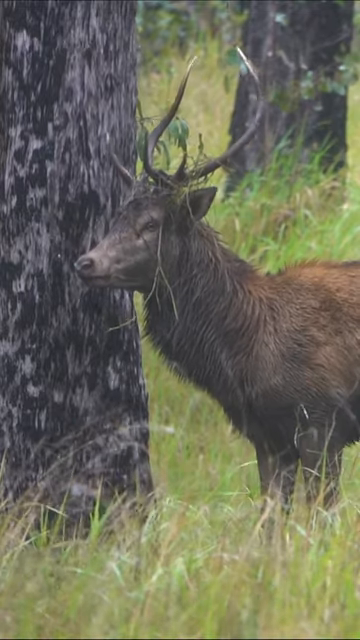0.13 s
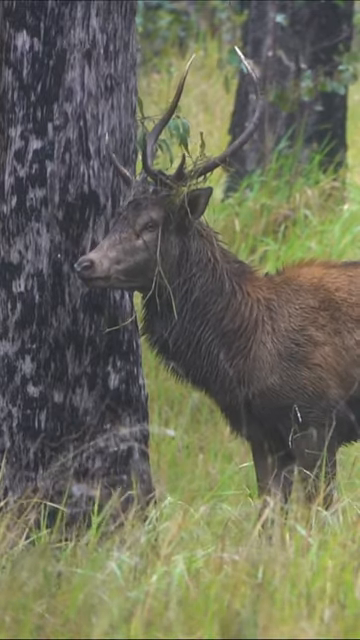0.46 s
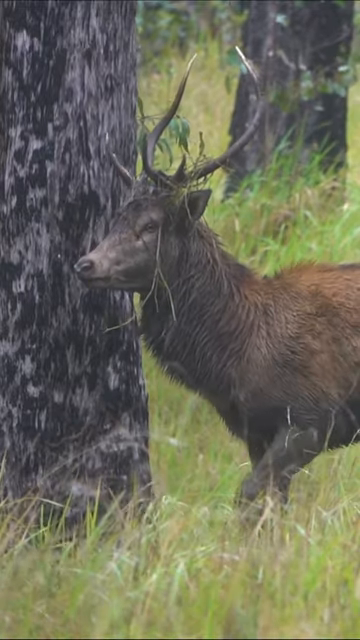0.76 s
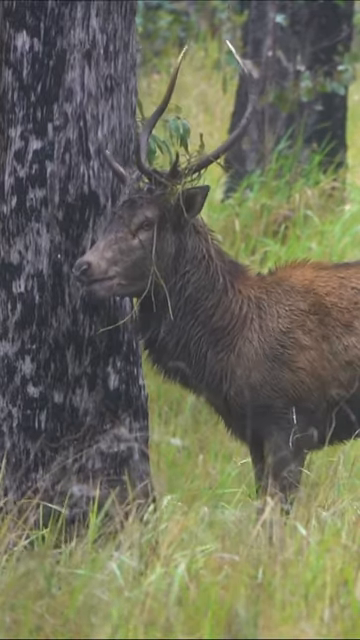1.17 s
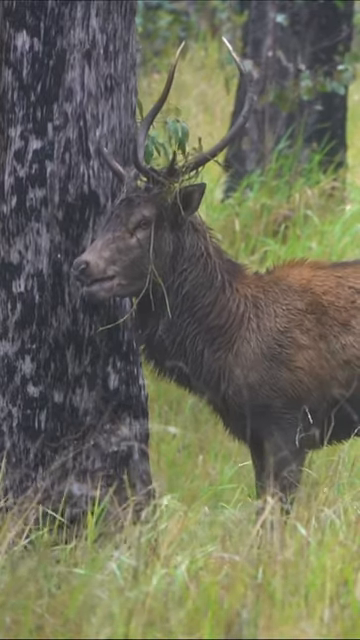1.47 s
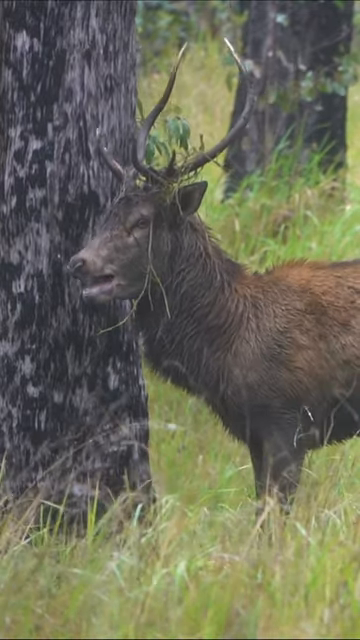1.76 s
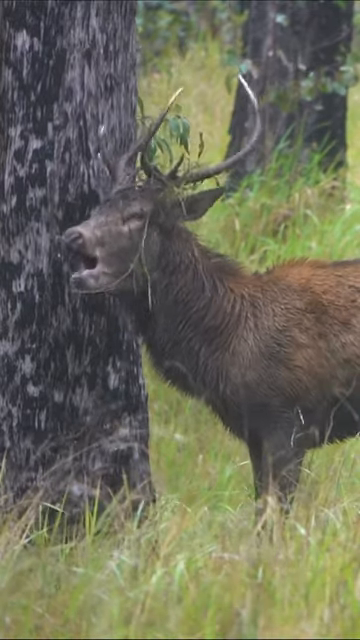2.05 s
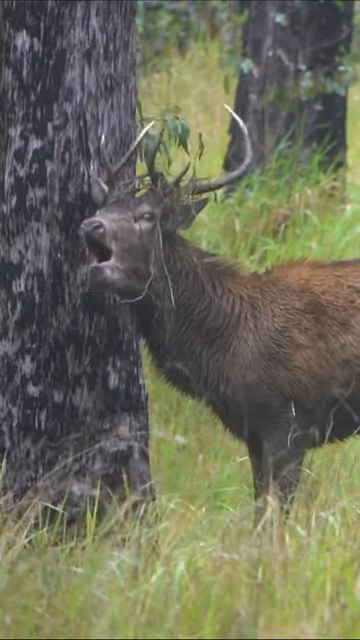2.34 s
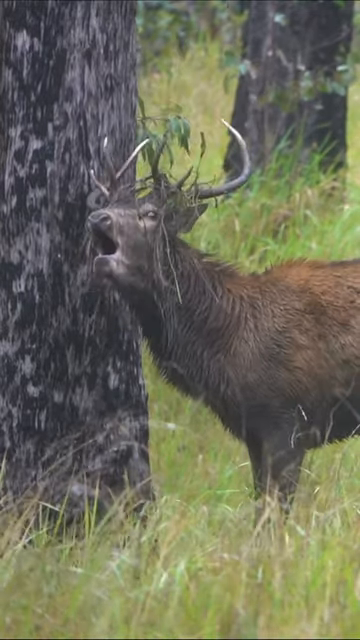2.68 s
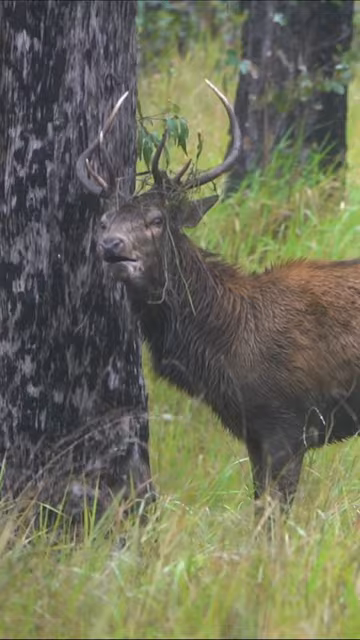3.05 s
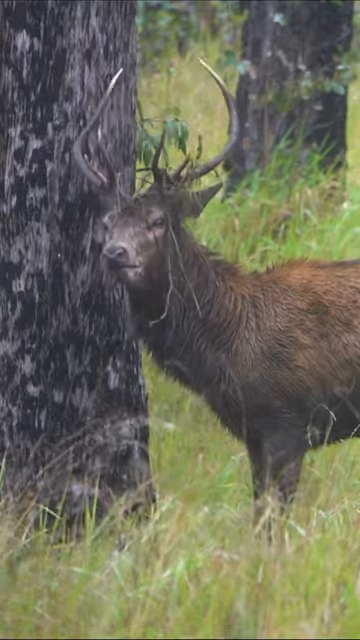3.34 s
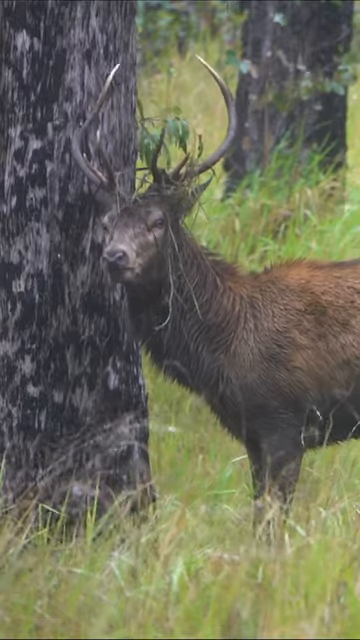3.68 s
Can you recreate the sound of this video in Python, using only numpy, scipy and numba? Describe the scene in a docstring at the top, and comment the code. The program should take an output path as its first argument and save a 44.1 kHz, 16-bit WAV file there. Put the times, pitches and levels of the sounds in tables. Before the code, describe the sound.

Single low guttural roar from a large deer, over microphone wind rumble and small stem clicks.

```python
"""A large stag roars once in tall grass among trees: vocal-fold pulses and puffs of breath ring a long
throat whose resonances shift as the neck stretches and the mouth opens; two low tones sound from the chest.
Dry stems tick as noise bursts with short rings, over a random crackle. Wind on the microphone is gusting low
noise with soft thumps. The wood returns a dull echo, a decaying noise tail, and hisses faintly as shaped noise."""
import sys
import numpy as np
from scipy import signal
from scipy.fft import rfft, irfft
from scipy.io import wavfile
from scipy.ndimage import uniform_filter1d
from numba import njit

SR = 44100
rng = np.random.default_rng(int(sys.argv[2]) if len(sys.argv) > 2 else 0)


def inscribe(sig):
    """Save sig as 16-bit PCM at rate SR to the path in sys.argv[1].

    A 1-D sig is mono; a 2-D sig holds one channel per row.
    Samples are clipped to [-1, 1] before scaling.
    """
    pcm = np.round(np.clip(np.atleast_2d(sig).T, -1, 1) * 32767)
    wavfile.write(sys.argv[1], SR, pcm.astype(np.int16))


N = 168021  # samples


def amp(db):
    """Decibels to amplitude."""
    return 10 ** (np.asarray(db) / 20)


def rms_one(x):
    """Scale to an rms of 1."""
    return x / np.sqrt(np.mean(x ** 2) + 1e-20)


def in_time(rows):
    """Join the rows of a time table by straight lines, one signal per column after t."""
    s, *columns = np.transpose(rows)
    return [np.interp(np.arange(N) / SR, s, column) for column in columns]


def drift(rate_hz):
    """Slow random wander of rms 1: noise at every 40th sample through two equal low-pass poles."""
    r = np.exp(-80 * np.pi * rate_hz / SR)
    noise = rng.standard_normal(N // 40 + 2002)
    slow = signal.lfilter([1], [1, -2 * r, r * r], noise)[2000:]  # settled part
    return np.interp(np.arange(N) / 40, np.arange(len(slow)), rms_one(slow))


def coloured(points):
    """Noise of rms 1 whose spectrum follows the points, joined over log frequency."""
    hz, db = np.transpose(points)
    f = np.maximum(np.arange(N // 2 + 1) * SR / N, 1)
    gain = amp(np.interp(np.log(f), np.log(hz), db))
    return rms_one(irfft(rfft(rng.standard_normal(N)) * gain, N))


def ring(x, hz, t60):
    """A struck resonance: a sine that falls 60 dB in t60 seconds."""
    r, w = amp(-60 / (t60 * SR)), 2 * np.pi * hz / SR
    return signal.lfilter([0, np.sin(w)], [1, -2 * r * np.cos(w), r * r], x + 1e-18)


@njit
def moving_resonance(x, turn, r):
    """A resonance of gain 1 with a moving centre; turn is the cosine of its angle per sample."""
    y = np.zeros(len(x))
    for i in range(2, len(x)):
        y[i] = (1 - r * r) / 2 * (x[i] - x[i - 2]) + 2 * r * turn[i] * y[i - 1] - r * r * y[i - 2]
    return y


PITCH_SHAKE, PITCH_SHAKE_HZ = .011, 25  # rms share of pitch at full roughness, rate
SHIMMER_DB = 2  # pulse flicker per unit of roughness away from 0.54
RASP_DB, RASP_LOW_HZ = -1, 400  # puffs against pulses before the low cut, and that cut


def vocal_folds(hz, rough):
    """Steady fold pulses give harmonics; a puff of noise in each cycle replaces them as the voice roughens."""
    shaken_hz = hz * (1 + PITCH_SHAKE * rough * drift(PITCH_SHAKE_HZ))
    phase = 2 * np.pi * np.cumsum(shaken_hz) / SR
    pulses = rms_one(sum(np.cos(k * phase) for k in range(3, 58)))  # chest() adds tones 1 and 2
    puffs = rms_one(rng.standard_normal(N) * (1 - np.sin(phase)) ** 2) * amp(RASP_DB)
    puffs = signal.lfilter(*signal.butter(1, RASP_LOW_HZ, "high", fs=SR), puffs)
    shimmer = amp(SHIMMER_DB * drift(26) * (rough - 0.54))
    return phase, pulses * shimmer * np.sqrt(1 - rough ** 2) + rough * puffs


WANDER_DB, WANDER_SHARE, WANDER_HZ = 1.8, .006, 6.  # rms wander of level, of frequency (share), rate
# Throat resonances: width of the two passes together (nearly) f/Hz, then centre f/Hz and relative
# level/dB in each of the seven postures.
THROAT_RESONANCES = [(63.6, 270, -13, 313, -7, 277, -5, 285, -5, 337, -11.5, 340, -12.5, 355, -8),
                     (39, 490, -28, 455, -19.5, 473, -8, 461, 1, 450, -8, 455, -14.5, 470, -5.5),
                     (69, 610, -13, 632, -6, 606, -13, 564, -13.5, 589, -9.5, 602, -5, 560, -16),
                     (80, 910, -2.5, 829, -19.5, 672, -3.5, 700, -6, 708, -17.5, 824, -37, 680, -10),
                     (66, 1090, -6, 1013, -1.5, 857, -12, 1000, -2.5, 982, -8, 966, -4.5, 1066, -7),
                     (100, 1350, -3, 1448, -4, 1270, -2, 1200, -23, 1400, -13, 1190, -22, 1200, -8),
                     (103, 1785, 3, 1720, 1, 1550, -4.5, 1430, 5, 1383, 0, 1340, -2, 1536, -3.5),
                     (110, 2200, -16, 2060, 1.5, 1820, -0.5, 1843, -0.5, 1745, 1, 1750, -1, 1815, -6.5),
                     (84, 2300, -5, 4200, -8, 1900, -7, 2040, -10, 2050, -12, 2050, -8, 2100, -9.5),
                     (59, 2520, -8, 2490, -2.5, 2470, 1, 2280, -19, 3200, -15, 2250, -7.5, 2380, -10),
                     (91.9, 2750, -34, 2896, -11.5, 2800, -11, 2520, -23, 2580, -12, 2600, -16.5, 3000, -20),
                     (91, 2900, -28, 3120, -23, 2400, -19, 2300, -25, 3300, -17.5, 3100, -16.5, 3000, -13.5),
                     (116, 3600, -17, 3570, -19.5, 3320, -17.5, 3250, -8, 3600, -16, 3300, -15.5, 3800, -26),
                     (150, 4400, -63.5, 5000, -54, 3580, -13.5, 3480, -13, 3500, -9.5, 3480, -11.5, 3000, -23),
                     (200, 4100, -60, 8600, -56, 4200, -31, 3900, -18, 4400, -15.5, 3685, -24, 4900, -20),
                     (194, 6000, -73, 6400, -48, 5300, -46, 4300, -32, 4150, -16.5, 3500, -23, 3700, -24),
                     (186, 5500, -60, 4700, -62, 5900, -27, 3800, -30, 4550, -33, 4520, -20, 4100, -31),
                     (163, 5100, -60, 5900, -55, 4600, -25, 5200, -25.5, 5060, -22.5, 4906, -24, 5000, -29),
                     (200, 7100, -47, 6250, -39, 5300, -53, 8600, -29, 6030, -33.5, 6150, -36.5, 8400, -60),
                     (300, 8500, -75, 8500, -70, 8300, -72, 9100, -33, 9100, -26, 9600, -40, 8300, -60),
                     (300, 9710, -68, 9800, -68, 9500, -65, 10000, -25.5, 8600, -37, 9300, -58, 9300, -66),
                     (305, 9400, -70, 11000, -68, 8800, -65, 12000, -33, 11000, -27, 9500, -52, 10400, -65)]


def throat(source, posture, shorter):
    """The air column rings in parallel resonances that move with posture and rise as it shortens."""
    out = 0
    for width, *shape in THROAT_RESONANCES:
        steps = np.arange(len(shape) // 2)
        centre_hz = np.interp(posture, steps, shape[0::2])
        centre_hz = centre_hz * (1 + shorter / 100 + WANDER_SHARE * drift(WANDER_HZ))
        turn = np.cos(2 * np.pi * centre_hz / SR)
        r = np.exp(-np.pi * 1.5 * width / SR)  # each pass is wider, as two passes narrow the peak
        rung = moving_resonance(moving_resonance(source, turn, r), turn, r)
        level_db = np.interp(posture, steps, shape[1::2]) + WANDER_DB * drift(WANDER_HZ)
        out = out + amp(level_db) * rung
    return out


# Side cavities: width f/Hz, then centre f/Hz and share removed (0-1) in each of the seven postures.
CAVITY_GAPS = [(148, 780, .6, 690, 0.23, 890, 0.46, 870, .7, 800, .8, 780, 0.9, 890, 0.54),
               (204, 1880, .5, 2150, 0.71, 2219, 0.41, 1800, 1, 2330, 0.97, 2383, 1, 2496, .6),
               (182, 3330, 0.93, 2510, 0.41, 2550, .6, 2800, 0.67, 2760, 0.54, 2730, 0.77, 3100, 0.96),
               (201, 3600, 0.43, 3140, 0.95, 3700, 0.93, 3080, 1, 3600, 0.53, 3040, .8, 3700, 0.51),
               (700, 3100, .95, 3970, 1, 4050, .3, 6100, 0.45, 5540, 0.67, 5500, 0.73, 6100, .9)]


def side_cavities(x, posture, shorter):
    """Side cavities of nose and mouth swallow narrow bands, taken out one after another."""
    for width, *shape in CAVITY_GAPS:
        steps = np.arange(len(shape) // 2)
        centre_hz = np.interp(posture, steps, shape[0::2]) * (1 + shorter / 100)
        turn = np.cos(2 * np.pi * centre_hz / SR)
        share = np.clip(np.interp(posture, steps, shape[1::2]), 0, 1)
        x = x - share * moving_resonance(x, turn, np.exp(-np.pi * width / SR))
    return x


# The two lowest tones of the voice: t/s, rms level/dB of the first, rms level/dB of the second.
CHEST_TONES = [(.95, -79, -69), (1.0, -49, -64), (1.07, -49, -47), (1.15, -63, -64.5), (1.21, -56, -62),
               (1.4, -48, -54), (1.62, -57.5, -53), (1.8, -59.5, -55), (1.96, -57, -53.5),
               (2.04, -56.5, -50.5), (2.2, -52, -50.5), (2.36, -57, -40), (2.48, -53.5, -34),
               (2.65, -53, -37.5), (2.82, -53, -33.5), (3.05, -54.5, -44), (3.13, -52, -52),
               (3.17, -70, -67), (3.2, -78, -86)]


def chest(phase):
    """The fundamental and second harmonic sound clean from the chest, past the throat."""
    first_db, second_db = in_time(CHEST_TONES)
    return np.sqrt(2) * (amp(first_db) * np.cos(phase) + amp(second_db) * np.cos(2 * phase))


FADE_S = 0.043  # fade in before the first row of the roar, fade out after the last
# Course of the roar: t/s, pitch f/Hz, level/dB of the throat sound evened above 300 Hz.
ROAR_COURSE = [(.95, 110, -61), (.97, 110.9, -64.5), (1.03, 113.7, -50.5), (1.071, 113.6, -43),
               (1.169, 105.8, -42), (1.19, 105.8, -44), (1.299, 110.2, -41.5), (1.341, 109.8, -40),
               (1.418, 113.9, -38.5), (1.479, 112.7, -37), (1.6, 115.9, -37), (1.81, 111.5, -38),
               (1.86, 106.9, -37.5), (1.94, 99.94, -39), (1.972, 99.27, -41.5), (2.02, 96.15, -38),
               (2.051, 96.16, -36.5), (2.089, 98.9, -37.5), (2.15, 97.73, -36), (2.2, 99.35, -36),
               (2.261, 102.4, -36.5), (2.29, 106.1, -34.5), (2.361, 112.4, -38.5), (2.408, 116.4, -36),
               (2.511, 117.5, -35), (2.559, 120, -33), (2.61, 121.8, -40), (2.671, 121.6, -38.5),
               (2.87, 117.1, -35), (3.06, 113.5, -43.5), (3.09, 112.1, -42), (3.12, 108, -42),
               (3.151, 115, -49.5), (3.17, 112.5, -65), (3.2, 113.2, -77)]
# Neck and mouth: t/s, posture (0 onset, 1 mouth shut, 2 neck stretching, 3 mouth opening, 4 wide,
# 5 wide with the head turning, 6 closing), roughness (0-1), throat shortening (% rise of resonances).
NECK_AND_MOUTH = [(.95, 0., 0.86, 1.5), (1.02, 0., .5, 0.5), (1.08, 0.5, 0.16, 0.6), (1.18, 1.1, 0.37, 1.9),
                  (1.3, 1.13, 0.092, 0.9), (1.45, 1.46, 0.059, -0.8), (1.62, 1., .08, 1.3),
                  (1.78, 1.78, .12, -.5), (1.86, 1.7, 0.46, -1.2), (1.93, 2., 0.47, 0),
                  (2.05, 2.5, 0.59, 0.4), (2.1, 3.5, 0.44, 0.3), (2.18, 3.5, 0.41, 0.2),
                  (2.28, 4.5, 0.61, 1.5), (2.42, 4, 0.2, 0.4), (2.56, 4.5, 0.28, 0.5),
                  (2.65, 4.5, 0.14, .4), (2.85, 4.5, 0.077, 1.3), (3.02, 5.5, .12, -1.3),
                  (3.08, 6, 0.46, -1), (3.11, 6., 0.84, 0), (3.15, 6.5, 0.99, 4.5), (3.2, 6., .95, 4)]


def roar():
    """Folds drive the throat; its loudness is evened, then follows the course, with the chest beneath."""
    hz, level_db = in_time(ROAR_COURSE)
    posture, rough, shorter = in_time(NECK_AND_MOUTH)
    phase, source = vocal_folds(hz, np.clip(rough, 0, 1))
    voiced = side_cavities(throat(source, posture, shorter), posture, shorter)
    upper = signal.sosfilt(signal.butter(4, 300, "high", fs=SR, output="sos"), voiced)
    # the sign sets how the throat sound meets the chest tones
    even = -voiced / np.sqrt(uniform_filter1d(upper ** 2, size=4000))
    t = np.arange(N) / SR
    inside_s = np.minimum(t - ROAR_COURSE[0][0], ROAR_COURSE[-1][0] - t)
    fade = np.clip(inside_s / FADE_S + 1, 0, 1)
    return (even * amp(level_db) + chest(phase)) * fade


TICK_T60_S, TICK_CYCLES = 0.021, 14  # 60 dB decay of the burst's noise; of the ring, in cycles
TICK_LOW_SHARE, TICK_HIGH_SHARE = 0.25, 1.26  # burst band edges as shares of ring frequency
TICK_SNAP = 8.7  # first crack added to noise of rms 1
CRACKLE_PER_S, CRACKLE_DB = 40, -69  # mean rate, weakest impulse
# Stem ticks: t/s, peak level/dB of the ring alone, ring f/Hz.
STEM_TICKS = [(0.043, -47.5, 2570), (0.076, -51, 6150), (.221, -60, 9000), (.236, -47.5, 9250),
              (.327, -56, 6500), (.333, -54, 8000), (.463, -48, 2560), (.652, -50, 2500), (.663, -35, 3660),
              (.668, -30.5, 7000), (.714, -53, 4000), (.744, -46, 6000), (.791, -51, 5300),
              (1.384, -44.5, 6440), (1.418, -50, 7880), (1.624, -45, 5460), (1.764, -45.5, 7100),
              (1.798, -52, 8600), (1.92, -56.5, 12800), (2.010, -45, 9600), (2.08, -61, 9660),
              (2.202, -53, 7514), (2.23, -51, 8700), (2.298, -41.5, 5850), (2.343, -51, 11930),
              (2.457, -50.5, 8160), (2.54, -48.5, 7990), (2.883, -61.5, 9850), (2.888, -46.5, 11550),
              (2.899, -49, 8200), (2.921, -54, 8410), (3.124, -46, 5200), (3.177, -55, 11560),
              (3.4, -52, 6900), (3.431, -42.5, 3010), (3.552, -50.5, 6640), (3.691, -50, 4150),
              (3.719, -53, 5100)]


def ticks():
    """Each dry stem snaps with a short broad burst and a brief ring; smaller ones crackle at random."""
    out, t = np.zeros(N + 2000), np.arange(2000) / SR
    for s, db, hz in STEM_TICKS:
        noise = rng.standard_normal(2000) + TICK_SNAP * (t == 0)
        high_cut = signal.butter(1, min(TICK_HIGH_SHARE * hz, 18000), fs=SR)
        low_cut = signal.butter(2, TICK_LOW_SHARE * hz, "high", fs=SR)
        dying = signal.lfilter(*high_cut, noise) * amp(-60 * t / TICK_T60_S)
        burst = signal.lfilter(*low_cut, dying)
        tone = ring(burst, hz, TICK_CYCLES / hz)
        tick = tone / np.abs(tone).max() + amp(-0.5) * burst / 2
        out[int(s * SR):][:2000] += amp(db) * tick
    strength_db = CRACKLE_DB + 8.4 * np.minimum(rng.exponential(1, N), 4)
    small = (rng.random(N) < CRACKLE_PER_S / SR) * amp(strength_db)
    dealt = rng.integers(0, 6, N)  # each small crack goes to one of six rings
    crackle = sum(ring(small * (dealt == k), hz, 8.0 / hz)
                  for k, hz in enumerate(np.geomspace(2000, 11000, 6)))
    return out[:N] + crackle


WIND_TOP = .3  # amplitude ceiling; the largest swings are rounded off
THUMP_S, THUMP_HZ = 0.015, 218  # spread of each bell-shaped swell, high cut of its noise
# Strength of the wind at the microphone: t/s, rms level/dB before rounding.
WIND_GUSTS = [(0.03, -23.5), (0.52, -28), (0.61, -33), (0.79, -21.5), (1.8, -22), (1.85, -15.5),
              (1.93, -34), (1.99, -18), (2.03, -26.5), (2.23, -17), (2.58, -29), (2.63, -12.5), (2.79, -32),
              (2.9, -21.5), (3.03, -29.5), (3.32, -16), (3.58, -23), (3.78, -12)]
# Spectrum of the rumble: f/Hz, relative level/dB per Hz.
WIND_SPECTRUM = [(2.4, -19), (4.0, -6), (16, 6.5), (22, -7.5), (29, -10), (33, -21.5), (54, -24),
                 (96, -35.5), (200, -58), (260, -95), (440, -120)]
# Wind thumps: t/s (one spread before the crest), noise level/dB at the crest.
WIND_THUMPS = [(1.179, -45.5), (1.62, -44.5), (1.775, -50), (1.981, -49.5), (2.188, -44), (2.3, -44),
               (3.354, -50), (3.404, -53)]


def wind():
    """Wind on the microphone: lumpy low noise swells with the gusts, and a few soft thumps."""
    rumble = coloured(WIND_SPECTRUM) * amp(in_time(WIND_GUSTS)[0])
    rumble = WIND_TOP * np.tanh(rumble / WIND_TOP)
    t = np.arange(N) / SR
    low_noise = signal.lfilter(*signal.butter(2, THUMP_HZ, fs=SR), rng.standard_normal(N))
    swells = sum(amp(db) * np.exp(-((t - s - THUMP_S) / THUMP_S) ** 2 / 2) for s, db in WIND_THUMPS)
    return rumble + rms_one(low_noise) * swells


ECHO_DB, ECHO_T60_S, ECHO_DELAY_S = -15, 0.97, 0.023  # tail gain, 60 dB decay, wait after the direct voice
ECHO_LOW_HZ, ECHO_CUT_HZ = 350, 3350  # band edges


def wood(voice):
    """Trunks scatter the voice back to the microphone as a dull dying wash."""
    t = np.arange(SR) / SR
    tail = rng.standard_normal(SR) * amp(-60 * t / ECHO_T60_S) * (t > ECHO_DELAY_S)
    tail = signal.lfilter(*signal.butter(1, [ECHO_LOW_HZ, ECHO_CUT_HZ], "band", fs=SR), tail)
    tail = tail / np.sqrt(np.sum(tail ** 2))
    return amp(ECHO_DB) * signal.fftconvolve(voice, tail)[:N]


HISS_DB, HISS_FLICKER_DB = -61, .4  # middle level, rms flicker
# Spectrum of the hiss: f/Hz, relative level/dB per Hz.
HISS_SPECTRUM = [(100, -18.5), (160, 0), (250, -2.5), (470, -2), (700, -7), (1000, -10.5), (2000, -15.5),
                 (4000, -19), (8000, -20.5), (10000, -27), (13000, -31), (16000, -34)]


def wood_hiss():
    """The wood's faint background: shaped noise whose level flickers slightly."""
    return amp(HISS_DB + HISS_FLICKER_DB * drift(9.1)) * coloured(HISS_SPECTRUM)


def scene():
    """The stag, the stems, the wind and the wood together, in one channel."""
    voice = roar()
    return (voice + ticks() + wind() + wood(voice) + wood_hiss())[None]


def record(dry):
    """A steep low-pass cuts the top, down 60 dB from 15.8 kHz."""
    return signal.sosfilt(signal.cheby2(20, 60, 15800, fs=SR, output="sos"), dry)


dry = scene()
out = record(dry)
inscribe(out)
```